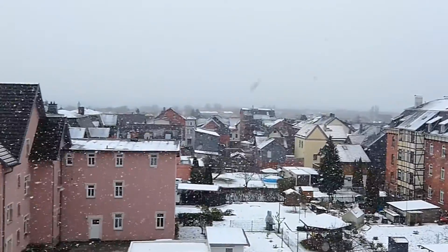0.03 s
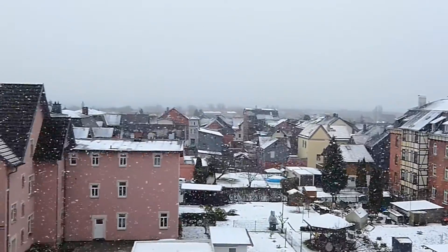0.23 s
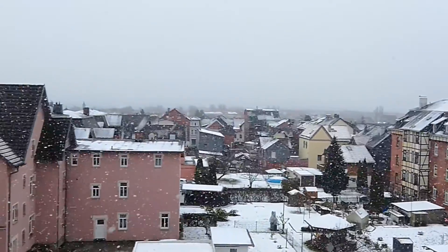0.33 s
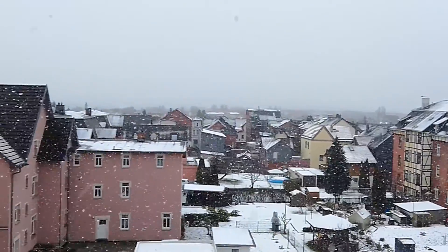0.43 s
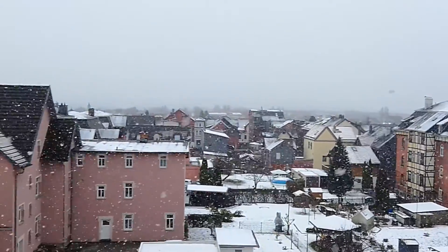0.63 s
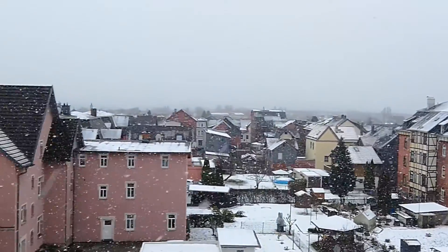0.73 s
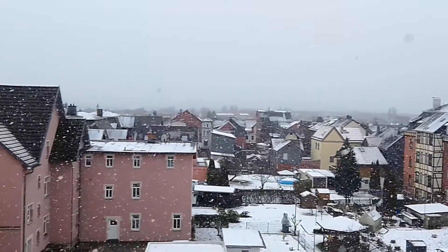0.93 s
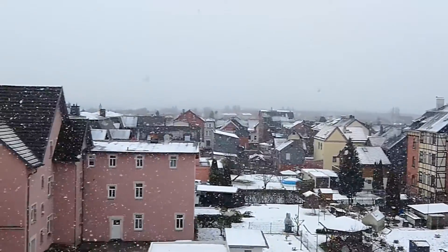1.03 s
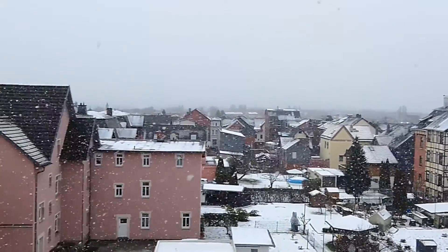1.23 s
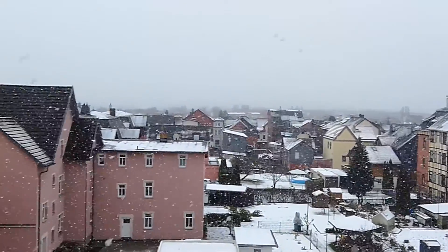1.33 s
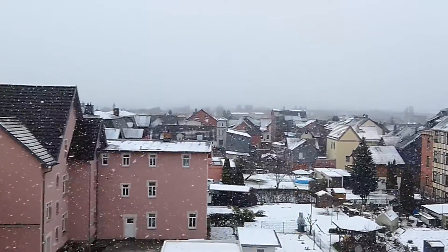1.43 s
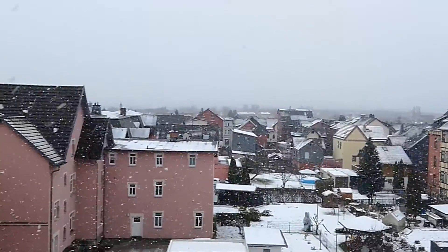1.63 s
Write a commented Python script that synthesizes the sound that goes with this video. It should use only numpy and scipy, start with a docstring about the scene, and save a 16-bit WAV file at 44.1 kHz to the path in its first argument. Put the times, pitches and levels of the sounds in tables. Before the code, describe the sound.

Light wind gusts rumble on the microphone over a faint outdoor hiss.

```python
"""Light gusts brush a microphone above a quiet town in falling snow.
At first faint turbulence stirs over the hiss of open air, a far hum and a patter of snow grains.
From 0.2 s the gusts rumble; faster air adds a flutter, large eddies thump and the crests rasp.
One grain ticks nearby, the wind drops briefly, and a second group of gusts peaks near 0.7 s.
After 1 s the gusts die away and the hum fades, leaving the soft hiss."""
import sys
import numpy as np
from scipy import signal
from scipy.fft import rfft, irfft, next_fast_len
from scipy.io import wavfile
from scipy.ndimage import uniform_filter1d

SR = 44100
rng = np.random.default_rng(int(sys.argv[2]) if len(sys.argv) > 2 else 0)


def waveform_to_disk(signal):
    """Save audio, clipped to [-1, 1], as 16-bit WAV at the path in sys.argv[1]."""
    frames = np.transpose(np.atleast_2d(signal))
    scaled = np.clip(frames, -1, 1) * 32767
    samples = np.round(scaled).astype(np.int16)
    wavfile.write(sys.argv[1], SR, samples)


N = 74970


def amp(db):
    """The decibel scale: 20 dB is a factor of ten in amplitude."""
    return 10 ** (np.asarray(db) / 20)


def unit_rms(x):
    """Normalisation to a mean power of one."""
    return x / np.sqrt(np.mean(x ** 2) + 1e-20)


def curves(rows):
    """Linear interpolation: one value per sample for each column after the time."""
    time_s, *columns = np.transpose(rows)
    return [np.interp(np.arange(N) / SR, time_s, column) for column in columns]


def filtered(x, response):
    """The convolution theorem: filtering multiplies the spectrum by a frequency response."""
    size = next_fast_len(N + 8192)
    return irfft(rfft(x, size) * response(np.fft.rfftfreq(size, 1 / SR)), size)[:N]


def noise(spectrum):
    """Spectral shaping: white noise takes a spectrum drawn on a log frequency axis, at rms 1."""
    frequency_hz, density_db = np.transpose(spectrum)
    white = rng.standard_normal(N)
    shaped = filtered(white, lambda hz: amp(np.interp(np.log(hz + 1), np.log(frequency_hz + 1), density_db)))
    return unit_rms(shaped)


def turbulence(spectrum, even_s):
    """Envelope normalisation: noise stays lumpy from moment to moment but steady over even_s."""
    pressure = noise(spectrum)
    window = int(even_s * SR)
    power = np.abs(signal.hilbert(pressure)) ** 2
    mean_power = uniform_filter1d(uniform_filter1d(power, window), window)
    return unit_rms(pressure / np.sqrt(np.abs(mean_power) + 1e-6))


# Gust strength in four successive phases, before the trims: time_s, rumble_db, flutter_db
GUSTS_RISING = [(0.0, -62, -73.5), (0.126, -67.5, -73.5), (0.144, -44.5, -63), (0.172, -52, -65.5),
                (0.208, -27, -59), (0.222, -37.5, -50.5)]
GUSTS_FIRST = [(0.244, -22.5, -38.5), (0.276, -18.5, -30), (0.332, -42, -54), (0.354, -31.5, -54),
               (0.37, -30, -46), (0.402, -19.5, -31.5), (0.424, -23.5, -62), (0.444, -21.5, -37),
               (0.456, -35.5, -43), (0.468, -33, -30.5), (0.518, -31.5, -42.5), (0.53, -35, -70),
               (0.542, -58.5, -78)]
GUSTS_SECOND = [(0.565, -58, -77.5), (0.587, -33.5, -82), (0.613, -26, -52.5), (0.637, -36.5, -74),
                (0.645, -37.5, -86), (0.679, -25, -73), (0.699, -35.5, -58.5), (0.721, -24, -29),
                (0.741, -26.5, -32), (0.773, -50, -46), (0.813, -32.5, -43.5), (0.869, -54.5, -59),
                (0.903, -38, -67), (0.94, -61, -74.5)]
GUSTS_DYING = [(0.96, -56, -66.5), (1.036, -54, -79), (1.058, -72, -62), (1.082, -61, -84),
               (1.124, -81, -67), (1.174, -44, -76), (1.198, -46.5, -70), (1.242, -45.5, -72),
               (1.276, -52.5, -65), (1.308, -62, -82), (1.406, -67.5, -72), (1.432, -68.5, -79),
               (1.7, -69.5, -74.5)]
# Spectra of the deep rumble and of the small eddies: frequency_hz, relative_density_db
RUMBLE_SPECTRUM = [(10, -5.5), (25, -1.5), (42, -11.5), (64, 7), (82, -3), (120, -2.5), (180, -15.5),
                   (250, -24.5), (350, -44), (600, -96.5)]
FLUTTER_SPECTRUM = [(80, -28.5), (160, 3.5), (220, 2), (265, -2), (320, -1), (410, -13.5), (500, -23),
                    (620, -39.5), (800, -53), (1200, -78.5)]
RUMBLE_TRIM_DB, FLUTTER_TRIM_DB = -2, 0.5

def gusts():
    """Turbulent pressure: air tumbling over the microphone port rumbles, and small eddies flutter."""
    rumble_db, flutter_db = curves(np.vstack([GUSTS_RISING, GUSTS_FIRST, GUSTS_SECOND, GUSTS_DYING]))
    rumble = amp(rumble_db + RUMBLE_TRIM_DB) * turbulence(RUMBLE_SPECTRUM, even_s=0.045)
    flutter = amp(flutter_db + FLUTTER_TRIM_DB) * turbulence(FLUTTER_SPECTRUM, even_s=0.023)
    return rumble + flutter


# Spectrum of the open air: frequency_hz, relative_density_db
AIR_SPECTRUM = [(20, 0.5), (170, -2.5), (280, -7), (380, -3.5), (530, -11), (750, -5), (1050, -2.5),
                (1400, -2), (2000, -7), (3400, -11.5), (5000, -18), (8000, -29), (12500, -38), (15500, -32)]
# Envelope of the open air: time_s, level_db
AIR_LEVEL = [(0, -65.5), (0.75, -65.5), (1.1, -67), (1.7, -68)]

def open_air():
    """Broadband ambient noise: distant town and wind merge in a hiss that eases slightly."""
    level_db, = curves(AIR_LEVEL)
    return amp(level_db) * noise(AIR_SPECTRUM)


# Spectrum of the town's hum, one narrow peak: frequency_hz, relative_density_db
HUM_SPECTRUM = [(550, -60.5), (660, -21), (683, -5), (705, -23), (820, -60)]
# Envelope of the fading hum: time_s, level_db
HUM_LEVEL = [(0, -79), (0.7, -81.5), (1.1, -84.5), (1.7, -90.5)]

def far_hum():
    """Narrowband noise: neighbouring frequencies beat, so the town's faint hum wavers."""
    level_db, = curves(HUM_LEVEL)
    return amp(level_db) * noise(HUM_SPECTRUM)


# Spectrum of a snow grain's impact: frequency_hz, relative_density_db
GRAIN_SPECTRUM = [(2000, -29), (4500, -0.5), (7500, -3.5), (9500, -8), (12000, -30.5), (15000, -48.5)]
# Envelope of the patter: time_s, level_db
PATTER_LEVEL = [(0, -91.5), (0.85, -91.5), (1.1, -96), (1.7, -90.5)]
# A grain landing nearby: centre_s, level_db
NEAR_GRAINS = [(0.456, -72)]
IMPACT_S, LANDINGS_PER_S, LANDING_SPREAD_DB = 0.00073, 760, 3.5

def snow_grains():
    """Shot noise: blown grains land at random in a faint patter, and a near one ticks."""
    t = np.arange(N) / SR
    level_db, = curves(PATTER_LEVEL)
    landings = rng.random(N) < LANDINGS_PER_S / SR
    strengths = amp(LANDING_SPREAD_DB * rng.standard_normal(N))
    patter = amp(level_db) * unit_rms(uniform_filter1d(landings * strengths, int(IMPACT_S * SR)))
    tick = sum(amp(db) * np.exp(-((t - centre_s) / IMPACT_S) ** 2) for centre_s, db in NEAR_GRAINS)
    return noise(GRAIN_SPECTRUM) * (patter + tick)


# Large eddies crossing the port: centre_s, peak_db, centre_hz
EDDIES = [(0.234, -27, 311), (0.265, -26, 311), (0.276, -19.5, 150), (0.374, -12, 109.6), (0.397, -17, 200),
          (0.520, -22, 65), (0.723, -17, 181), (0.743, -23, 241), (0.811, -17, 149), (0.83, -29, 201),
          (0.893, -39.5, 133), (1.074, -47, 90), (1.209, -39.5, 139), (1.257, -38, 120.4),
          (1.363, -51, 49.6), (1.404, -50, 57.6)]

def eddy_thumps():
    """A pressure transient: each large eddy gives one dip between two smaller rises, with no ring."""
    t, pressure = np.arange(N) / SR, np.zeros(N)
    for centre_s, peak_db, centre_hz in EDDIES:
        phase = np.pi * centre_hz * (t - centre_s)
        pressure -= amp(peak_db) * (1 - 2 * phase ** 2) * np.exp(-phase ** 2)
    return pressure


# Crests of the gusts: centre_s, level_db, half_length_s
CRESTS = [(0.243, -57.5, 0.0032), (0.264, -60, 0.031), (0.757, -61, 0.05)]
# Spectrum of the rasp: frequency_hz, relative_density_db
RASP_SPECTRUM = [(250, -21), (450, -2.5), (600, -1.5), (750, -7.5), (950, -11), (1500, -65.5)]

def rim_rasps():
    """Edge noise: the fastest air rasps on the rim of the port and brightens the crests a little."""
    t = np.arange(N) / SR
    envelope = sum(amp(level_db) * np.exp(-((t - centre_s) / half_length_s) ** 2)
                   for centre_s, level_db, half_length_s in CRESTS)
    return envelope * noise(RASP_SPECTRUM)


def scene():
    """Superposition: wind on the microphone adds to air, town and snow in one channel."""
    wind = gusts() + eddy_thumps() + rim_rasps()
    return (wind + open_air() + far_hum() + snow_grains())[None]


BAND_LIMIT_HZ = 15650

def record(dry):
    """An ideal low-pass filter: nothing above the band limit passes."""
    return filtered(dry[0], lambda hz: hz < BAND_LIMIT_HZ)[None]


dry = scene()
out = record(dry)
waveform_to_disk(out)
```